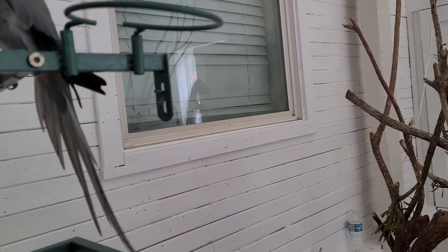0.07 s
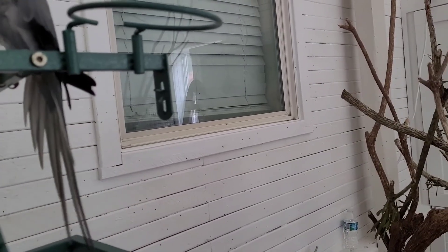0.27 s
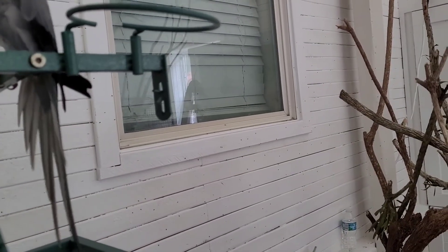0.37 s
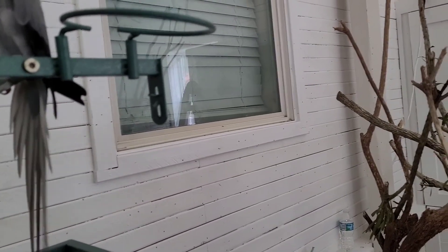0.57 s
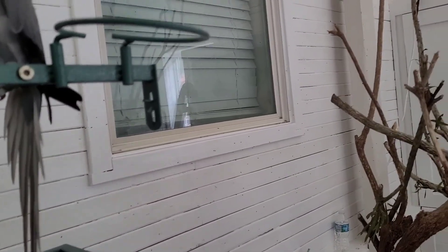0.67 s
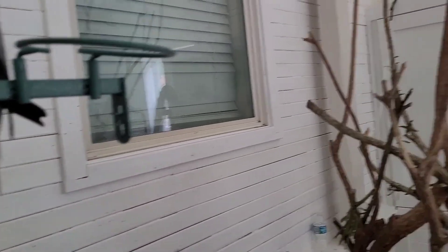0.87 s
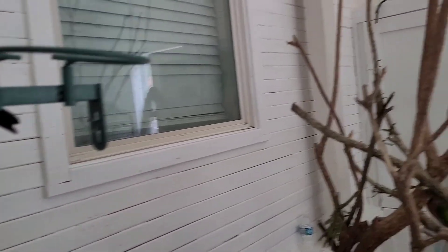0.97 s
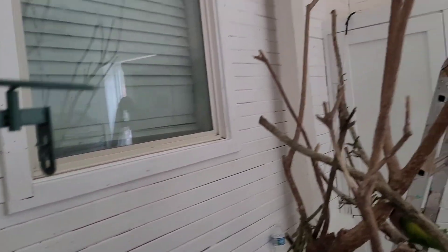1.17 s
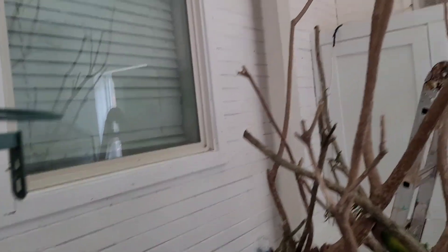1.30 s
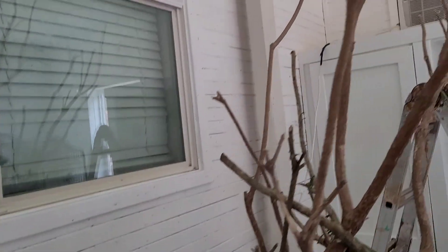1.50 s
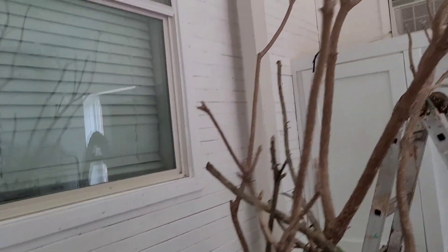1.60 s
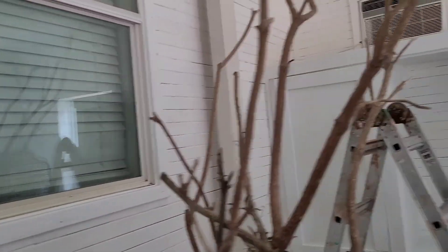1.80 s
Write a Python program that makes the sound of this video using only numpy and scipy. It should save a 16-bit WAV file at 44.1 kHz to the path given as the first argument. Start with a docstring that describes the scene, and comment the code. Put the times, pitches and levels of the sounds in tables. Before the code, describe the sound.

Parrot calls in a hard, ringing room. The echo of an earlier squawk fades at the start, with two tiny ticks before 0.1 s. From 0.2 to 0.55 s a loud screech dips, climbs and breaks into a piercing whistle. A short raspy squawk rises and falls around 0.8-0.95 s; a softer, lower yelp follows near 1.5-1.65 s. Bright tails linger over faint rumble and low hum.

```python
"""Parrots squawk three times in a hard-walled room, as the echo of an earlier squawk dies away.
Each call is a gliding stack of harmonics coloured by the bird's throat; the first breaks into a whistle.
The room smears every glide into a ringing tail: direct sound, a few wall reflections, decaying noise.
Two faint ticks are bursts of bright noise; underneath lie a rumble of shaped noise and a low sine hum."""
import sys
import numpy as np
from scipy import signal
from scipy.fft import rfft, irfft
from scipy.io import wavfile
from scipy.ndimage import uniform_filter1d, minimum_filter1d

SR = 44100
rng = np.random.default_rng(int(sys.argv[2]) if len(sys.argv) > 2 else 0)


def master(y):
    """Save y as 16-bit WAV."""
    cut = np.clip(np.atleast_2d(y).T, -1, 1)
    pcm = np.round(cut * 32767)  # scale
    wavfile.write(sys.argv[1], SR, pcm.astype(np.int16))


N = 81585
LEAD = SR // 4  # samples of time before zero
EDGE_HZ = 14900  # top of the band


def amp(db):
    """Decibels to gain."""
    return 10 ** (np.asarray(db) / 20)


def unit(x):
    """Scales to rms 1."""
    return x / np.sqrt(np.mean(x ** 2) + 1e-20)


def read(points, hz):
    """Reads a table on a log-frequency axis."""
    f, value = np.transpose(points)
    return np.interp(np.log(hz + 1), np.log(f + 1), value)


def add(mix, s, sound):
    """Places a sound at time s."""
    part = mix[LEAD + round(s * SR):][:len(sound)]
    part += sound[:len(part)]


def wobble(t, hz, count=1):
    """Rows of random motion up to a rate, drawn as lines between random knots."""
    knots = rng.standard_normal((count, 1024))
    position = 2 * hz * (t - t[0])
    return np.array([np.interp(position, np.arange(len(row)), row) for row in knots])


HARMONICS = 16
ATTACK_S, RELEASE_S = .003, .006
JITTER, JITTER_HZ = .004, 350  # pitch unsteadiness (fraction) and its rate
SHIMMER, SHIMMER_HZ = .12, 200.9  # loudness unsteadiness (fraction) and its rate
FLUTTER_DB, FLUTTER_HZ = 3.5, 45  # flicker of the upper harmonics
RASP_HZ = 414.8  # rate of the phase noise
SOFT_TILT, SOFT_TILT_ABOVE_HZ = .24, 1600  # dB per octave for each dB below the call's peak
CLOSING_S = .023  # time the beak takes to close, from the middle of a call


def call(curve, throat, rasp_db, closing_db=0):
    """Unsteady, raspy harmonics glide under the throat's resonances; a closing beak mutes the upper ones.

    rasp_db is phase noise on the fundamental (dB re 1 radian); closing_db is a tilt in dB per octave.
    """
    s, pitch, level = np.transpose(curve)
    t = np.arange(s[0], s[-1], 1 / SR)
    hz, effort = np.interp(t, s, pitch), np.interp(t, s, level)
    unsteady_hz = hz * (1 + JITTER * wobble(t, JITTER_HZ)[0])
    phase = 2 * np.pi * np.cumsum(unsteady_hz) / SR

    k = np.arange(1, HARMONICS + 1)[:, None]
    flutter_depth = FLUTTER_DB * np.clip((k - 2) / 2, 0, 1)  # full from the fourth harmonic up
    flutter = flutter_depth * wobble(t, FLUTTER_HZ, count=len(k))
    # softer moments lean towards the treble
    octaves_above = np.log2(np.maximum(k * hz / SOFT_TILT_ABOVE_HZ, 1))
    soft_tilt = SOFT_TILT * (level.max() - effort) * octaves_above
    closed = np.clip((t - t.mean()) / CLOSING_S, 0, 1)
    closing = closing_db * closed * np.log2(k)

    gains = amp(read(throat, k * hz) + flutter + soft_tilt + closing) * (k * hz < EDGE_HZ)
    gains /= np.sqrt((gains ** 2).sum(0) / 2)  # colour only: the level comes from the curve
    rasp = amp(rasp_db) * np.sqrt(k) * wobble(t, RASP_HZ, count=len(k))
    voice = (gains * np.sin(k * phase + rasp)).sum(0)

    fade_in = np.clip((t - s[0]) / ATTACK_S, 0, 1)
    fade_out = np.clip((s[-1] - t) / RELEASE_S, 0, 1)
    shimmer = 1 + SHIMMER * wobble(t, SHIMMER_HZ)[0]
    return s[0], voice * fade_in * fade_out * amp(effort) * shimmer


# first call, a dip and a climb: (time [s], pitch [Hz], level before the room [dB])
SCREECH_GLIDE = [(.188, 1670, -23), (.2, 1580, -22), (.222, 1400, -23), (.245, 1260, -18),
                 (.272, 1115, -11), (.295, 1070, -17), (.325, 1075, -22), (.36, 1235, -21), (.4, 1470, -23),
                 (.445, 1670, -21), (.465, 1850, -26), (.482, 2170, -26), (.491, 2330, -19),
                 (.502, 2560, -22)]
# its throat colour: (frequency [Hz], relative level [dB])
SCREECH_COLOUR = [(1050, -16), (1600, -10), (2300, -4.5), (3250, 6), (4100, -13), (5300, -12), (6600, -16),
                  (8500, -18.5), (11000, -25.5), (14000, -35)]
# the whistle it breaks into: (time [s], pitch [Hz], level before the room [dB])
WHISTLE_GLIDE = [(.498, 1030, -15), (.509, 1080, -8), (.524, 1116, -10), (.54, 1122, -19)]
# throat colour of the whistle: (frequency [Hz], relative level [dB])
WHISTLE_COLOUR = [(1100, -50), (2200, -29), (3050, 0), (3400, 0), (4400, -23), (5600, -14), (6700, -15),
                  (7900, -25), (8800, -32), (9400, -20), (10100, -20), (11300, -20), (14000, -34)]
SCREECH_DIRECT_DB = [3.5, .5]  # left, right


def screech():
    """Dips, climbs and breaks into a whistle, the third harmonic of a lower pitch taking over."""
    climb = room(*call(SCREECH_GLIDE, SCREECH_COLOUR, rasp_db=-45), SCREECH_DIRECT_DB)
    whistle = room(*call(WHISTLE_GLIDE, WHISTLE_COLOUR, rasp_db=-42), SCREECH_DIRECT_DB)
    return climb + whistle


# second call, an arch: (time [s], pitch [Hz], level before the room [dB])
SQUAWK_GLIDE = [(.75, 560, -57.5), (.785, 756.7, -37), (.802, 874, -23), (.813, 1014, -15.5),
                (.82, 1310, -16.5), (.83, 1499, -9), (.843, 1641, -9), (.865, 1710, -14.5),
                (.888, 1580, -29), (.9, 1324, -29), (.913, 1128, -25), (.935, 977, -33.5),
                (.965, 817, -35.5), (1.0, 683, -48.5), (1.06, 593, -58)]
# its throat colour: (frequency [Hz], relative level [dB])
SQUAWK_COLOUR = [(600, 33.5), (900, -6.5), (1300, -3), (1650, -11), (2100, 8.5), (3150, 9.5), (4000, -6),
                 (5100, -5), (6600, -13), (8300, -13), (11000, -15.5), (14000, -31)]


def squawk():
    """Pitch arches up and down with strong rasp; the beak closes in the second half."""
    voice = call(SQUAWK_GLIDE, SQUAWK_COLOUR, rasp_db=-26, closing_db=-7.5)
    return room(*voice, direct_db=[3, 0])


# third call, lower and softer: (time [s], pitch [Hz], level before the room [dB])
YELP_GLIDE = [(1.42, 469.5, -68), (1.44, 507.5, -49), (1.46, 655, -40), (1.475, 756, -28),
              (1.495, 887, -24.5), (1.518, 961, -24.5), (1.526, 1099, -19.5), (1.54, 1166, -20),
              (1.562, 1286, -25.5), (1.578, 1322, -29), (1.587, 1672, -26), (1.615, 1615, -33),
              (1.65, 1290, -43.5), (1.672, 894, -37), (1.705, 652, -51.5)]
# its throat colour: (frequency [Hz], relative level [dB])
YELP_COLOUR = [(500, 8.5), (800, -4), (1150, -11.5), (1700, 2.5), (2300, 2), (3200, -7.5), (4500, -13),
               (6000, -18), (8000, -23), (11000, -33), (14000, -38.5)]


def yelp():
    """A lower, softer arch with less rasp; the beak mutes the upper harmonics further."""
    voice = call(YELP_GLIDE, YELP_COLOUR, rasp_db=-36, closing_db=-12.5)
    return room(*voice, direct_db=[2, 2.5])


EARLIER_S, EARLIER_HZ, EARLIER_DB = .07, 1512, -32.5  # length, middle pitch, level before the room
EARLIER_GLIDE = .4  # the pitch falls from this fraction above the middle to as far below
# throat colour of the earlier call: (frequency [Hz], relative level [dB])
EARLIER_COLOUR = [(1100, -33), (1600, -20.5), (2200, -6), (2900, -9), (3500, -1.5), (4200, -16),
                  (5600, -29), (7000, -27), (8300, -17.5), (10000, -55), (14000, -32)]


def earlier_call():
    """A falling, very raspy call that ends at time zero, so that only its echo is heard."""
    start = (-EARLIER_S, EARLIER_HZ * (1 + EARLIER_GLIDE), EARLIER_DB)
    end = (0, EARLIER_HZ * (1 - EARLIER_GLIDE), EARLIER_DB)
    return room(*call([start, end], EARLIER_COLOUR, rasp_db=-4), SCREECH_DIRECT_DB)


# ticks: (time [s], level before the high-pass and the room [dB])
TICK_HITS = [(0.0293, -34.5), (0.0967, -31.5)]
TICK_DECAY_S, TICK_LOW_HZ = .0009, 5000


def ticks():
    """Tiny bright snaps: noise that decays within milliseconds, high-passed."""
    high_pass = signal.butter(2, TICK_LOW_HZ, "high", fs=SR, output="sos")
    t = np.arange(400) / SR
    heard = np.zeros((2, N))
    for s, db in TICK_HITS:
        snap = rng.standard_normal(len(t)) * np.exp(-t / TICK_DECAY_S)
        heard += room(s, amp(db) * signal.sosfilt(high_pass, snap), direct_db=[3, 3])
    return heard


# decay of the tail: (frequency [Hz], time to fall by 60 dB [s])
ROOM_DECAY = [(300, 0.15), (800, 0.48), (2000, 0.73), (3300, 0.6), (5500, 0.65), (9000, 0.52),
              (14000, 0.19)]
# first reflections: (delay [s], left gain [linear], right gain [linear])
WALL_ECHOES = [(.0019, .25, .2), (.0051, -.2, .3), (.0087, .25, -.2), (.0125, .15, .2)]
TAIL_DB = -3.5  # energy of the tail
TAIL_DELAY_S = .007  # silence before the tail, and then its fade-in time
EAR_LAG_S = .00046  # direct sound reaches the right ear later


def room(s, sound, direct_db):
    """A sound arrives directly, off a few near walls, and as a diffuse tail that differs at each ear."""
    dry = np.zeros(LEAD + N)
    add(dry, s, sound)
    # each frequency of a noise decays at its own rate
    hz, t, spectrum = signal.stft(rng.standard_normal((2, SR)), SR, nperseg=256)
    decay = amp(-60 * t / read(ROOM_DECAY, hz)[:, None])
    tail = signal.istft(spectrum * decay, SR, nperseg=256)[1]
    tail *= np.clip(np.arange(tail.shape[1]) / SR / TAIL_DELAY_S - 1, 0, 1)
    response = amp(TAIL_DB) * tail / np.linalg.norm(tail, axis=1, keepdims=True)
    response[[0, 1], [0, round(EAR_LAG_S * SR)]] += amp(direct_db)
    for delay, left, right in WALL_ECHOES:
        response[:, round(delay * SR)] += [left, right]
    return signal.fftconvolve(dry[None], response, axes=1)[:, LEAD:LEAD + N]


# spectrum of the rumble: (frequency [Hz], relative level per Hz [dB])
RUMBLE_COLOUR = [(20, -8), (60, -1), (95, -8), (140, -5), (185, -12), (270, -3), (420, -15), (800, -20),
                 (2000, -27), (5000, -35), (14000, -39)]
RUMBLE_DB = -57.5  # rms of the part shared by both ears
RUMBLE_SIDE = .42  # stereo difference relative to the shared part
HUM_HZ, HUM_DB = 69, -56  # level is rms


def room_tone():
    """A soft stereo rumble of shaped noise with a steady low sine hum."""
    colour = amp(read(RUMBLE_COLOUR, np.fft.rfftfreq(N, 1 / SR)))
    mid, side = unit(irfft(rfft(rng.standard_normal((2, N))) * colour, N))
    rumble = np.array([mid + RUMBLE_SIDE * side, mid - RUMBLE_SIDE * side])
    hum = np.sqrt(2) * np.sin(2 * np.pi * HUM_HZ * np.arange(N) / SR)
    return amp(RUMBLE_DB) * rumble + amp(HUM_DB) * hum


def scene():
    """Three calls, an earlier call's echo and two ticks sound in the room over its tone."""
    birds = screech() + squawk() + yelp() + earlier_call()
    return birds + ticks() + room_tone()


CEILING = .92  # peak the limiter allows


def record(dry):
    """A quick look-ahead limiter holds the peaks of both channels together; then the band limit."""
    gain = CEILING / np.maximum(abs(dry).max(0), CEILING)
    held = dry * uniform_filter1d(minimum_filter1d(gain, size=201), size=201)
    low_pass = signal.firwin(255, EDGE_HZ, window=("kaiser", 9), fs=SR)
    return signal.oaconvolve(held, low_pass[None], "same")


dry = scene()
out = record(dry)
master(out)
```